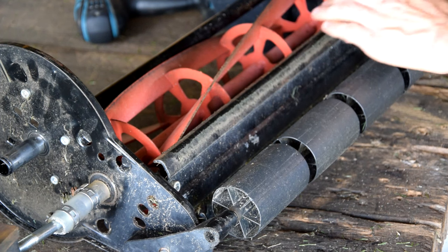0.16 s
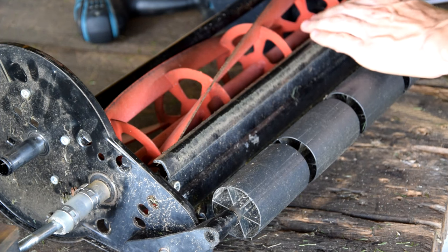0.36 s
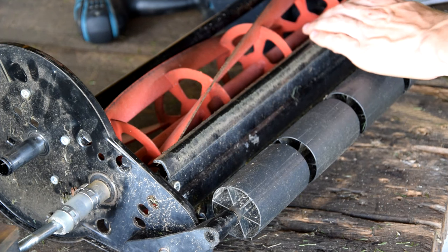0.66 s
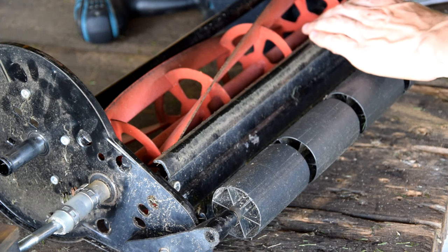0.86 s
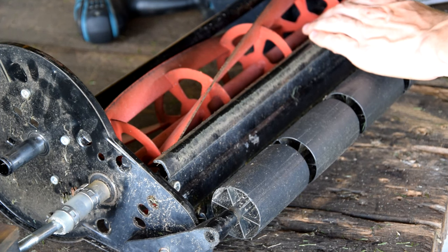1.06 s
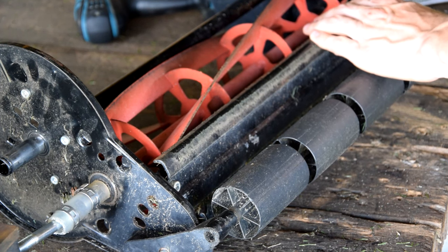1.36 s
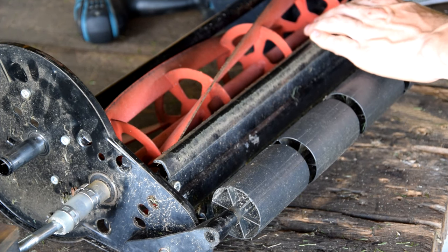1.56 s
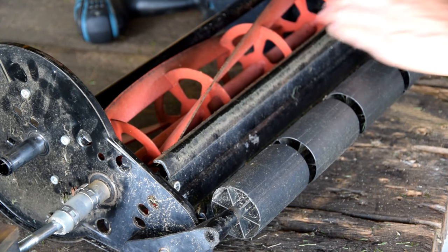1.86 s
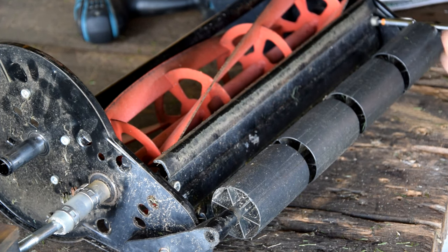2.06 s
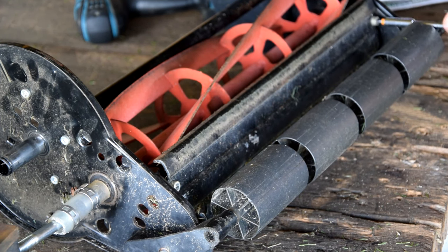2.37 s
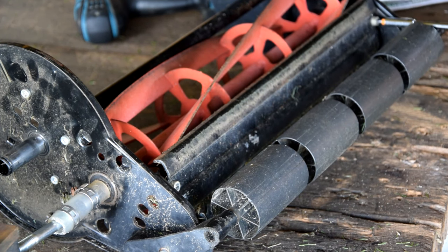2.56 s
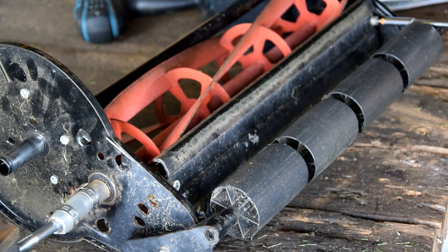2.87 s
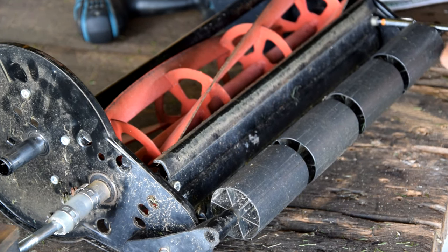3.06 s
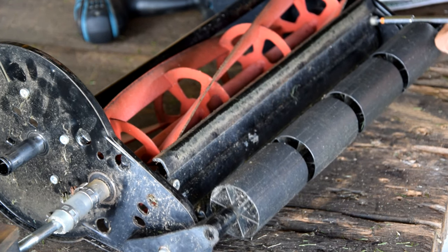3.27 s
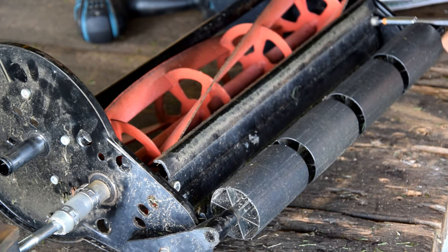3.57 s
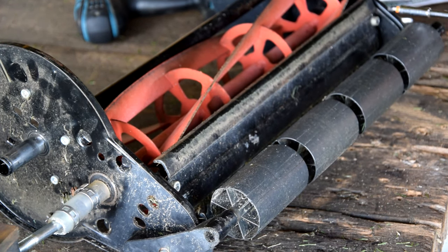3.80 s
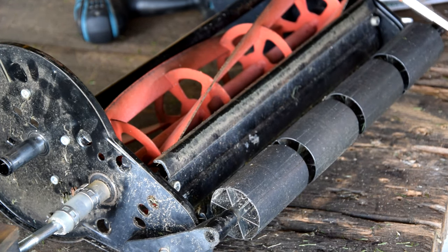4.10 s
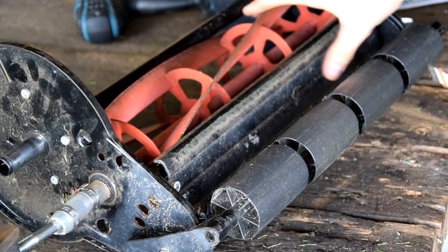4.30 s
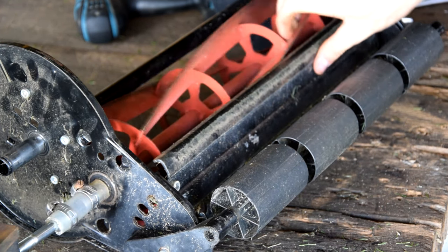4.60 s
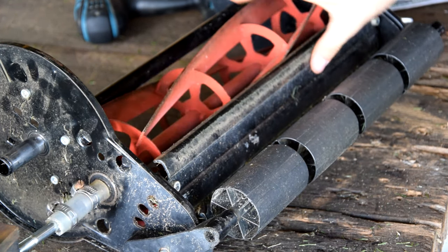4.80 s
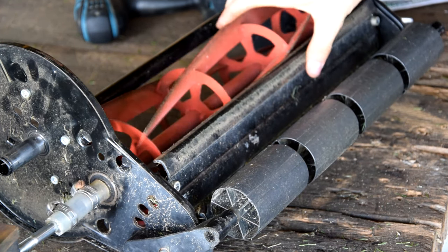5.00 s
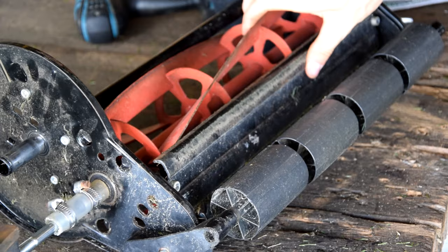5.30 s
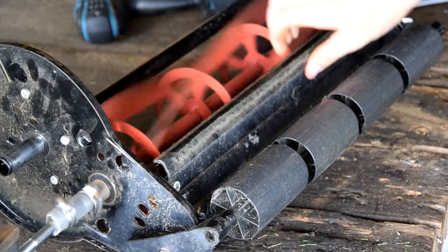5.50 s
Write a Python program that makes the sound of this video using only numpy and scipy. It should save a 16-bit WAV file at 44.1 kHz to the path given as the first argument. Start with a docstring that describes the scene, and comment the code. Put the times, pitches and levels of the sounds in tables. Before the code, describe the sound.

A hand clacks a mower's loose roller, light metallic ticks follow over quiet outdoor hiss and chirps, then turning blades give loud, sharp steel squeals.

```python
"""On a shed workbench, with the outdoors behind: coloured noise makes a soft hiss, a sine a thin high whine;
a fainter far hiss swells three times, and far chirps are short blurred rising tones. Close by, a hand clacks
a reel mower's loose roller (noise bursts into resonances), one blow jolts its frame, a screwdriver ticks on it
and the bench booms softly. Then the reel is turned by hand: each blade bites on the steel bed knife and squeals
with overtones, its pitch dipping at the bite and rising as the pressure eases to a slide, and lets go.
The loudest squeals overload the input."""
import sys
import numpy as np
from scipy import signal
from scipy.fft import rfft, irfft, next_fast_len
from scipy.io import wavfile

SR = 44100
rng = np.random.default_rng(int(sys.argv[2]) if len(sys.argv) > 2 else 0)


def master(y):
    """Save y as 16-bit WAV."""
    cut = np.clip(np.atleast_2d(y).T, -1, 1)
    pcm = np.round(cut * 32767)  # scale
    wavfile.write(sys.argv[1], SR, pcm.astype(np.int16))


N = 249165
TIME = np.arange(N) / SR
BAND_EDGES_HZ = np.geomspace(28, 17000, 25)

# outdoor air, distant: f/Hz, relative density/dB per Hz
AIR_COLOUR = [(30, -26.5), (70, -13.5), (170, -5), (300, -3.5), (600, -1), (1000, -0.5), (1400, -3),
              (2100, -8.5), (3300, -12), (4700, -17), (6200, -21), (9000, -27), (14000, -37.5),
              (15500, -39.5)]
AIR_DB = -54
# a faint far hiss swells at even intervals; the width is from its peak to 1/e
HISS_FIRST_S, HISS_EVERY_S, HISS_WIDTH_S, HISS_DB = .72, 2.16, 0.52, -70.5
# far chirps: t/s, centre f/Hz, level/dB
CHIRPS = [(0.121, 2690, -56), (.18, 3460, -54), (1.191, 4230, -52.5), (1.358, 2700, -58), (1.39, 3400, -55),
          (1.709, 4470, -53.5), (1.859, 5300, -59), (2.159, 4150, -56.5), (2.252, 2980, -57),
          (3.45, 4090, -52), (3.601, 2930, -50), (3.77, 4020, -54), (3.91, 4290, -54), (4.08, 5720, -58),
          (4.28, 2700, -54.5), (4.391, 4060, -57), (4.47, 3230, -54)]

# clacks of the loose roller under the hand, close by: t/s, force level/dB, brightness/dB per octave, rise/s, decay/s
KNOCKS = [(.333, -33.5, -6.5, 0.0089, 0.0087), (.426, -43, -3, 0.013, 0.011),
          (.455, -37, -7, 0.0034, 0.0063), (.468, -28.5, -4, 0.0087, 0.0088),
          (.702, -35, -7, 0.014, 0.0054), (.712, -25, 4.5, 0.00094, 0.0074),
          (.718, -20.5, 3.5, 0.0025, 0.0061), (.724, -32, 0, 0.0037, 0.0054)]
# colour of a clack: f/Hz, relative density/dB per Hz
KNOCK_COLOUR = [(60, -42), (180, -14), (270, -18.5), (380, -7), (650, -2), (1200, 2.5), (1900, -1),
                (2600, -4.5), (5000, -7), (9500, -15), (15000, -31)]
# roller resonances: f/Hz, width/Hz, relative level/dB
ROLLER_MODES = [(393, 43, 7.5), (527, 37, 2.5), (885, 46, -2.5), (1132, 41, -0.5), (1230, 47, 0.5),
                (1625, 58, -2.5), (2370, 97, 0.5), (2580, 110, 3.5), (3200, 100, 2)]
# reverberation of the shed: f/Hz, t60/s
ROOM_T60 = [(100, 0.086), (600, 0.47), (2300, 0.26), (6500, 0.18), (14000, 0.28)]
# the hardest clack also jolts the frame, which rings in these modes: f/Hz, level/dB, decay/s
FRAME_MODES = [(189, -49, 0.034), (379, -38, 0.032), (1177, -45.5, 0.014), (3370, -35, 0.032)]
JOLT_S = .717

# light ticks of the screwdriver on the frame: t/s, level/dB, brightness/dB per octave, rise/s, decay/s
TICKS = [(1.075, -41.5, -1, 0.0011, 0.02), (1.096, -47, 4.5, 0.0019, 0.0064),
         (1.545, -47, 3.5, 0.0016, 0.0059), (1.731, -42.5, -3.5, 0.00071, 0.0073),
         (1.825, -49, 4.5, 0.0023, 0.0071), (2.288, -39.5, -1, 0.0017, 0.018),
         (2.320, -41.5, -0.5, 0.0022, 0.007), (2.962, -44.5, 3.5, 0.012, 0.0074),
         (3.144, -46.5, 3.5, 0.0012, 0.006), (3.299, -49, 1.5, 0.0025, 0.074),
         (3.618, -48.5, 5, 0.0023, 0.0052), (3.673, -31, 0.4, 0.00081, 0.012)]
# colour of a tick: f/Hz, relative density/dB per Hz
TICK_COLOUR = [(80, -23), (210, -5.5), (400, 1.5), (700, 2.5), (900, 8.5), (1350, 5), (2100, -10),
               (3600, -8.5), (7000, -25.5), (15000, -41)]
# dull bumps of the mower on the bench: t/s, level/dB, decay/s
BUMPS = [(1.729, -43, 0.03), (2.33, -54, 0.033), (2.52, -62, 0.044), (3.34, -49, 0.052), (3.40, -63, 0.068),
         (3.686, -48.5, 0.026), (5.135, -36.5, 0.044), (5.579, -44.5, 0.067)]
# bench resonances: f/Hz, width/Hz, relative level/dB
BENCH_MODES = [(94, 9.9, 2), (113, 15, 7), (183, 24, -5.5)]

# an edge scrapes without squealing: peak t/s, force level/dB, swell/s, fade/s
SCRAPES = [(4.536, -31.5, 0.014, .006), (5.087, -29, 0.023, 0.01), (5.438, -31, 0.0036, 0.043),
           (5.548, -40, .012, .012)]
# colour of the rubbing: f/Hz, relative density/dB per Hz
RUB_COLOUR = [(40, -28.5), (110, -14), (190, -2.5), (270, -10), (420, 7.5), (900, -2.5), (1500, -6.5),
              (2700, -1), (3600, -8), (5500, -7), (8000, -9.5), (11000, -20), (15500, -37)]
# chassis modes that a biting, rubbing blade sets ringing: f/Hz, width/Hz, relative level/dB
CHASSIS_MODES = [(99, 1.2, 5.5), (205, 10, 6), (387, 19, -8), (498.4, 6.9, 0), (656, 3.1, 10), (784, 10, 3),
                 (866, 6.9, 3.5), (3730, 55, 1)]
# an edge bites on the bed knife and squeals: t/s, free pitch f/Hz, level of the fundamental at full pressure/dB,
# rise/s, decay/s, sliding share of the pressure, length/s, overtone fall/dB, pitch jitter as a share
SQUEALS = [(4.536, 2327, -3, .009, .023, .125, 0.12, 3.5, 0.02),
           (4.641, 2335, -17, 0.011, 0.0094, 0.092, 0.022, 14, 0.021),
           (5.123, 6600, -5.5, 0.0127, 0.0052, .08, 0.031, 12, 0.014),
           (5.453, 2318, 1, 0.01105, .017, 0.07, 0.109, 7, .012),
           (5.506, 2420, -10.5, .02, .005, .1, 0.022, 13.5, 0.0124),
           (5.573, 6456, -3, 0.0085, 0.0082, 0.13, 0.027, 16.5, .055)]
# long-ringing modes of the reel and bed knife: f/Hz, width/Hz, relative level/dB
STEEL_MODES = [(2138, 21, 2), (2188, 7, -4.5), (2270, 5, -7), (2300, 7.1, -2.5), (2400, 2.4, 0.5),
               (2413, 5, 2), (2495, 7.7, 4.5), (2633, 70, 2), (6487, 15, -11.5)]
# a blade meets the bed knife: t/s, force level/dB, brightness/dB per octave, rise/s, decay/s
CATCHES = [(5.117, -24.5, 0.5, 0.0012, 0.0058), (5.571, -25, 1.5, 0.0051, 0.0074)]
# modes of a blade landing on the bed knife: f/Hz, width/Hz, relative level/dB
CLINK_MODES = [(1850, 22.8, 10), (2766, 58, 15), (3650, 110, 14.5), (4900, 40, 9), (5460, 40, -5),
               (5900, 59, 22.5)]

# full pressure holds the pitch down by this much; a lighter touch has weaker overtones
PRESSED_DROP_HZ, EASED_DULL_DB = 139.3, 2
RELEASE_S = .006  # time constant of an edge letting go
# friction force under a squeal: level at full pressure of a 0 dB squeal, and the power of pressure it follows
RUB_DB, RUB_FOLLOWS = -23, 0.41
BITE_KICK_DB = 7  # kick of each bite on the chassis, relative to the squeal
# the overloaded input rectifies a little of what it clips, which adds a low thump
CLIP_LEVEL, THUMP_DB, THUMP_HZ = .97, -20, 110
CUTOFF_HZ = 15800


def from_db(db):
    """Decibels to gain."""
    return 10 ** (np.asarray(db) / 20)


def rms_one(x):
    """Scale to unit rms."""
    return x / np.sqrt(np.mean(x ** 2) + 1e-20)


def butter(x, order, hz, kind="low"):
    """Butterworth filter."""
    return signal.sosfilt(signal.butter(order, hz, kind, fs=SR, output="sos"), x)


def at_hz(points, hz):
    """Read a table on a log-frequency axis."""
    f, value = np.transpose(points)
    return np.interp(np.log(np.maximum(hz, 1)), np.log(f), value)


def noise(colour, tilt_db=0, size=N):
    """Unit noise of a given colour, tilted about 1 kHz by dB per octave."""
    padded = next_fast_len(size)
    hz = np.maximum(np.fft.rfftfreq(padded, 1 / SR), 1)
    gain = from_db(at_hz(colour, hz) + tilt_db * np.log2(hz / 1000))
    white = rfft(rng.standard_normal(padded))
    return rms_one(irfft(white * gain, padded)[:size])


def wander(rate_hz):
    """Smooth random motion of rms 1, slower than the given rate."""
    return rms_one(butter(rng.standard_normal(N), 2, rate_hz))


def resonate(x, modes):
    """Parallel two-pole resonances; the narrower the width, the longer the ring."""
    out = 0
    for hz, width, db in modes:
        r = np.exp(-np.pi * width / SR)
        poles = [1, -2 * r * np.cos(2 * np.pi * hz / SR), r * r]
        ring = signal.lfilter([1, 0, -1], poles, x + 1e-18)
        out = out + from_db(db) * (1 - r * r) / 2 * ring
    return out


def swell(start, rise, decay):
    """An envelope that rises straight and dies exponentially."""
    age = TIME - start
    return np.clip(age / rise, 0, 1) * np.exp(-np.clip((age - rise) / decay, 0, 40))


def narrow_hiss(hz, width):
    """Unit noise through the same resonance twice."""
    mode = [(hz, width, 0)]
    return rms_one(resonate(resonate(rng.standard_normal(N), mode), mode))


def background():
    """Outdoor air as coloured noise, a narrow singing noise band and a thin high sine whine."""
    singing = from_db(-64.5) * narrow_hiss(3857, 240)
    whine = from_db(-76.5) * np.sin(2 * np.pi * 15735 * TIME)
    return from_db(AIR_DB) * noise(AIR_COLOUR) + singing + whine


def high_hiss(centre_hz, width_hz):
    """A faint far noise band swells and fades three times."""
    peaks = [HISS_FIRST_S + k * HISS_EVERY_S for k in range(3)]
    level = sum(np.exp(-((TIME - peak) / HISS_WIDTH_S) ** 2) for peak in peaks)
    return from_db(HISS_DB) * level * narrow_hiss(centre_hz, width_hz)


def chirps(length, glide, blur):
    """Short rising calls, smeared by distance into narrow hiss: random pitch motion blurs each tone."""
    out, smear = np.zeros(N), wander(900)
    for s, hz, db in CHIRPS:
        near = np.abs(TIME - s) < .1
        age = (TIME[near] - s) / length
        pitch = hz * (1 + glide * age + blur * smear[near])
        phase = 2 * np.pi * np.cumsum(pitch) / SR
        out[near] += from_db(db) * np.exp(-age ** 2) * np.sin(phase)
    return out


def contacts(rows, colour, size=16384):
    """Each touch is a brief rattle of tiny contacts: a noise burst with its own brightness."""
    force = np.zeros(N)
    for s, db, tilt_db, rise, decay in rows:
        first = int(s * SR)
        part = slice(first, min(first + size, N))
        grains = noise(colour, tilt_db, size=size)[:part.stop - first]
        force[part] += from_db(db) * swell(s, rise, decay)[part] * grains
    return force


def roller_knocks():
    """The loose roller clacks and its resonances ring hollow."""
    # a part this small radiates little bass
    force = butter(contacts(KNOCKS, KNOCK_COLOUR), 2, 150, "high")
    return from_db(-4) * force + from_db(3.0) * resonate(force, ROLLER_MODES)


def room(x, build_s, size=32768):
    """Shed reflections: dense noise that builds up quickly and dies at a rate set by its frequency."""
    t, hz = np.arange(size) / SR, np.fft.rfftfreq(size, 1 / SR)
    white, response = rfft(rng.standard_normal(size)), 0
    for low, high in zip(BAND_EDGES_HZ, BAND_EDGES_HZ[1:]):
        band = irfft(white * ((hz >= low) & (hz < high)))
        t60 = at_hz(ROOM_T60, np.sqrt(low * high))
        response = response + band * from_db(-60 * t / t60)
    response = response * (1 - np.exp(-t / build_s))
    return signal.fftconvolve(x, response / np.sqrt(np.sum(response ** 2)))[:N]


def jolt():
    """One hard blow leaves the frame ringing briefly in a few decaying sines."""
    age, out = TIME - JOLT_S, 0
    for hz, db, decay in FRAME_MODES:
        out = out + from_db(db) * swell(JOLT_S, 0.0016, decay) * np.sin(2 * np.pi * hz * age)
    return out


def screwdriver_ticks():
    """The screwdriver ticks drily on the frame: bursts with no added resonance."""
    return contacts(TICKS, TICK_COLOUR)


def bumps():
    """The mower shifts its weight and the bench booms softly: resonant noise under short swells."""
    push = sum(from_db(db) * swell(s, 0.0036, decay) for s, db, decay in BUMPS)
    boom = push * rms_one(resonate(rng.standard_normal(N), BENCH_MODES))
    return butter(boom, 3, 62, "high")


def pressure(start, rise, decay, slide, length):
    """Force of an edge on the bed knife, 0-1: it bites, eases to a slide and lets go."""
    age = TIME - start
    bite = np.sin(np.pi / 2 * np.clip(age / rise, 0, 1)) ** 2
    eased = slide + (1 - slide) * np.exp(-np.maximum(age - rise, 0) / decay)
    release = np.exp(-np.clip((age - length) / RELEASE_S, 0, 60))
    return bite * eased * release


def plates(x, width_hz, spread_db, count=70):
    """The many close modes of the sheet steel give every scrape a metallic colour."""
    draws = rng.standard_normal((count, 2))
    hz = np.geomspace(900, 13000, count) * (1 + .015 * draws[:, 0])
    return resonate(x, [(f, width_hz, spread_db * d) for f, d in zip(hz, draws[:, 1])])


def scraping():
    """Force of the edge scraping without a squeal: exponential swells and fades."""
    out = 0
    for s, db, rise, fade in SCRAPES:
        away = np.maximum((s - TIME) / rise, (TIME - s) / fade)
        out = out + from_db(db) * np.exp(-np.minimum(away, 40))
    return out


def rubbing(grain_db, grit_db):
    """Gritty friction noise under each squeal and between them; friction and bites ring the chassis."""
    force, kicks = 0, np.zeros(N)
    for s, _, db, rise, decay, slide, length, _, _ in SQUEALS:
        force = force + from_db(db) * pressure(s, rise, decay, slide, length)
        kicks[int((s + rise) * SR)] = from_db(db + BITE_KICK_DB)
    level = np.hypot(from_db(RUB_DB) * force ** RUB_FOLLOWS, scraping())
    roughness = from_db(grain_db * wander(210) + grit_db * wander(1500))
    friction = level * roughness * noise(RUB_COLOUR)
    chassis = resonate(friction + kicks, CHASSIS_MODES)
    sheet = from_db(-8.5) * plates(friction, width_hz=34.4, spread_db=5)
    return from_db(-9.0) * friction + chassis + sheet


def squeal(row, jitter_hz, flutter_db, flutter_hz, overtone_db, overtone_flutter_db):
    """The edge sticks and slips once a cycle; pressure raises loudness and brightness and lowers the pitch."""
    s, hz, db, rise, decay, slide, length, fall_db, jitter = row
    force = pressure(s, rise, decay, slide, length)
    pitch = (hz - PRESSED_DROP_HZ * force) * (1 + jitter * wander(jitter_hz))
    phase = 2 * np.pi * np.cumsum(pitch) / SR
    dull_db = EASED_DULL_DB * (1 - force)
    out = np.sin(phase)
    for k in range(2, int(BAND_EDGES_HZ[-1] / hz) + 1):
        steady_db = overtone_db - fall_db * (k - 1) ** 0.39
        moving_db = overtone_flutter_db * wander(flutter_hz) - dull_db * (k - 1) ** 1.82
        out += from_db(steady_db + moving_db) * np.sin(k * phase)
    return force * from_db(db + flutter_db * wander(flutter_hz)) * out


def blades(top_hz, grit):
    """The blades squeal in turn and leave the steel ringing."""
    tone = sum(squeal(row, jitter_hz=382, flutter_db=2.5, flutter_hz=149,
                      overtone_db=-4, overtone_flutter_db=3.5) for row in SQUEALS)
    # dirt on the edge makes single slips unequal
    tone = tone * (1 + grit * wander(900))
    # a slip takes a moment, which rounds off the highest overtones
    tone = butter(tone, 4, min(top_hz, .45 * SR))
    return tone + resonate(tone, STEEL_MODES)


def catches():
    """Two blades land on the bed knife, each with a clink just before it squeals."""
    force = contacts(CATCHES, RUB_COLOUR)
    return force + from_db(2.5) * resonate(force, CLINK_MODES)


def scene():
    """The mower close by, its reflections in the shed and the outdoors beyond."""
    steel = blades(top_hz=13200, grit=0.068)
    friction = rubbing(grain_db=0.5, grit_db=2) + catches()
    handling = roller_knocks() + screwdriver_ticks() + jolt()
    sent = from_db(-10.5) * steel + from_db(-10.0) * friction + from_db(-10.5) * handling
    echo = room(sent, build_s=0.0005)
    outdoors = background() + chirps(length=.026, glide=.05, blur=.1)
    mix = steel + friction + handling + bumps() + echo + outdoors
    mix = mix + high_hiss(centre_hz=6100, width_hz=1500)
    return butter(mix, 2, 55, "high")[None]


def record(dry):
    """The microphone's input clips the loudest squeals; the deepest bass and the top are cut."""
    # clip at three times the rate to limit aliasing
    fine = signal.resample_poly(dry, 3, 1, axis=1)
    held = signal.resample_poly(np.clip(fine, -CLIP_LEVEL, CLIP_LEVEL), 1, 3, axis=1)
    excess = np.clip(np.abs(dry) - CLIP_LEVEL, 0, 1)
    held = held + from_db(THUMP_DB) * butter(excess, 2, THUMP_HZ)
    held = butter(held, 1, 40, "high")
    return signal.sosfilt(signal.ellip(10, .1, 70, CUTOFF_HZ, fs=SR, output="sos"), held)


dry = scene()
out = record(dry)
master(out)
```